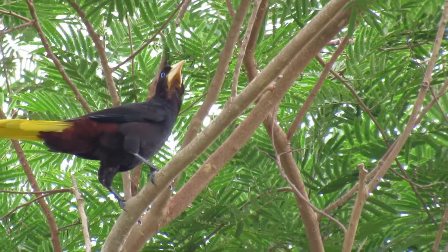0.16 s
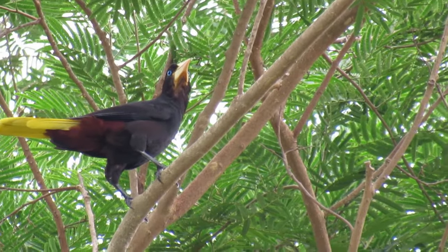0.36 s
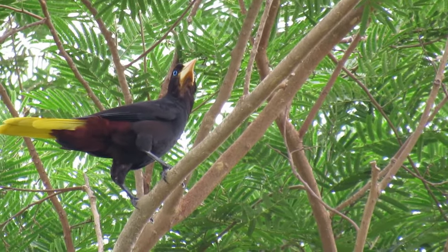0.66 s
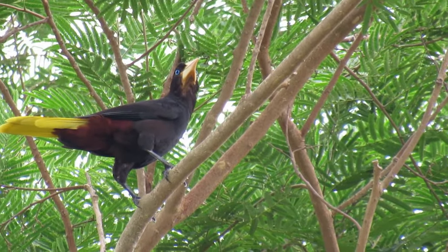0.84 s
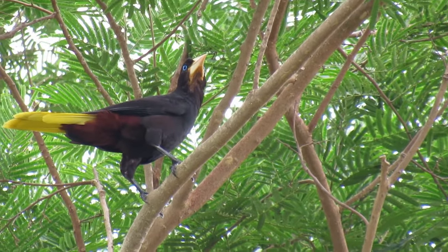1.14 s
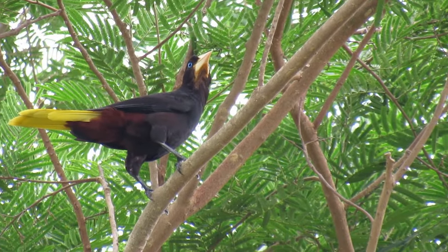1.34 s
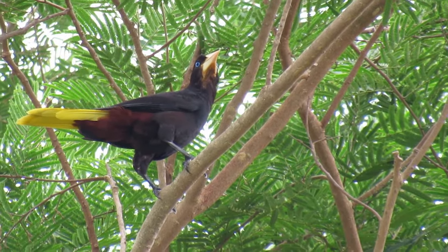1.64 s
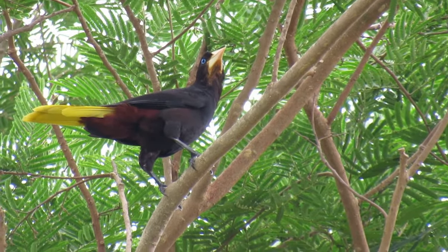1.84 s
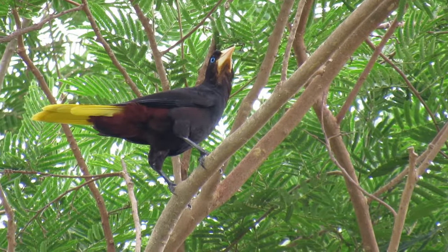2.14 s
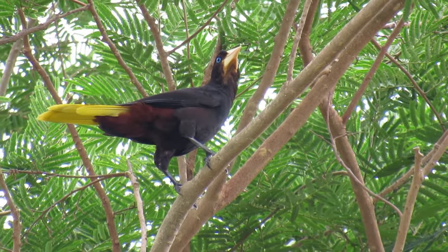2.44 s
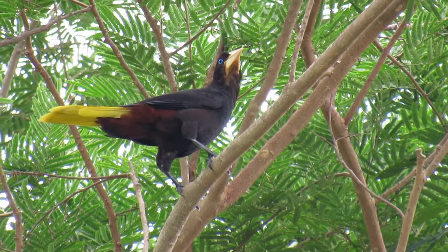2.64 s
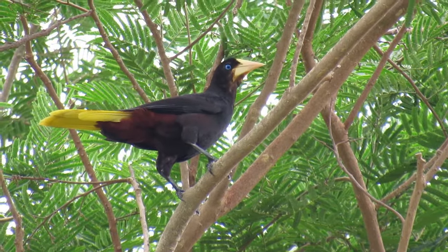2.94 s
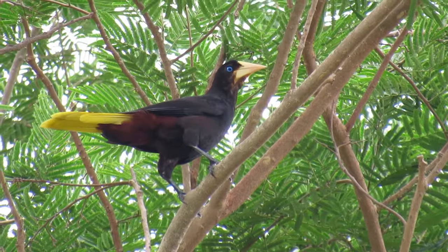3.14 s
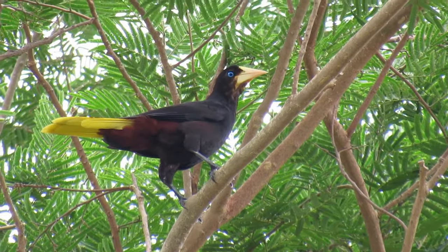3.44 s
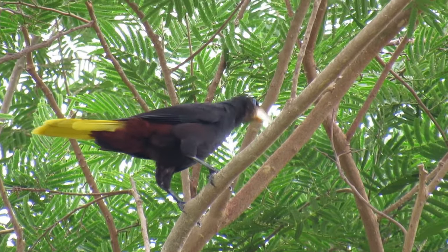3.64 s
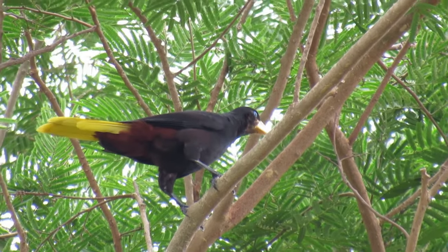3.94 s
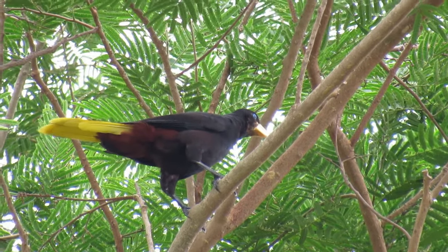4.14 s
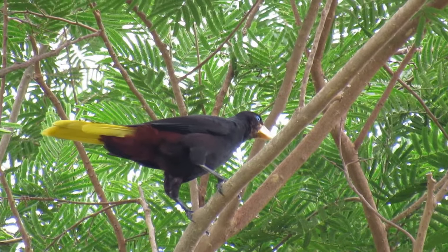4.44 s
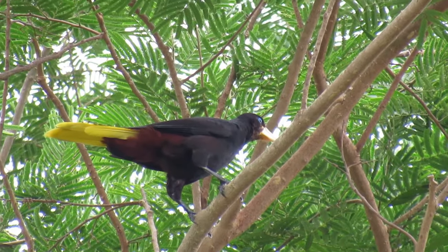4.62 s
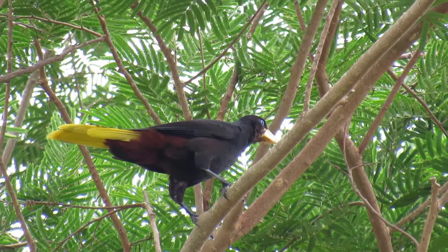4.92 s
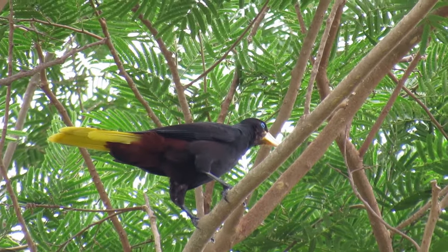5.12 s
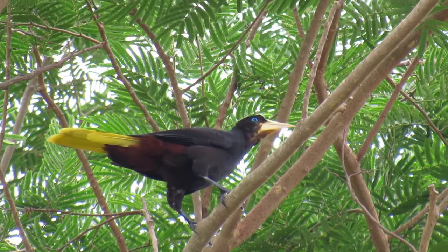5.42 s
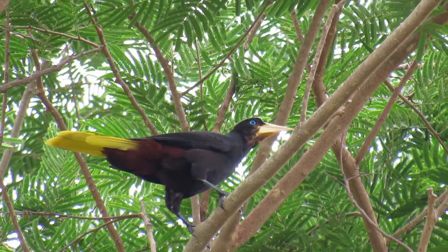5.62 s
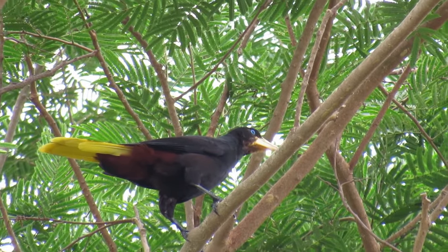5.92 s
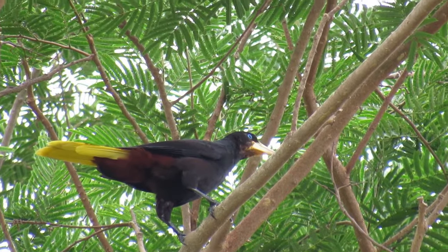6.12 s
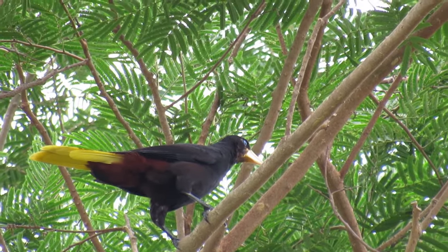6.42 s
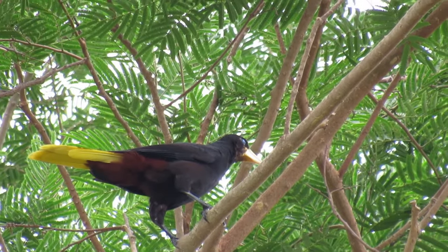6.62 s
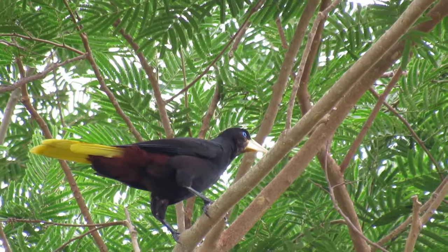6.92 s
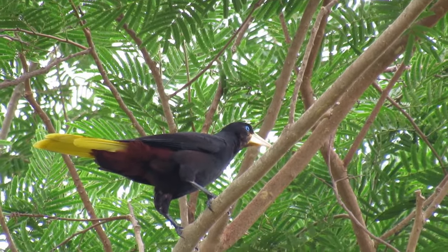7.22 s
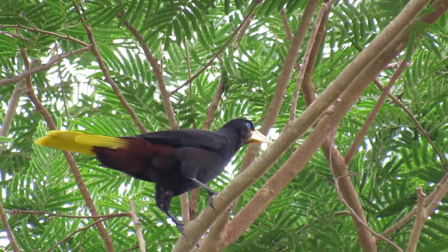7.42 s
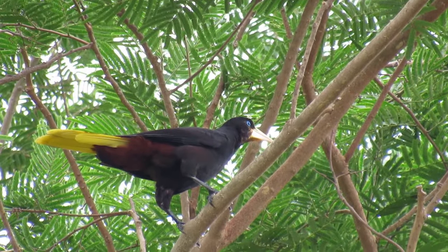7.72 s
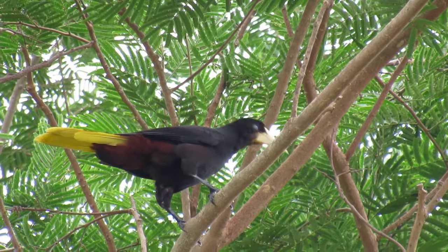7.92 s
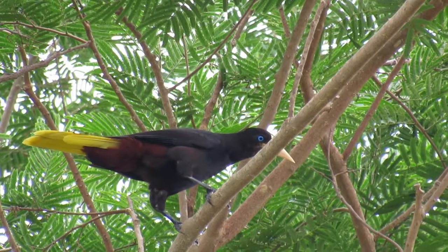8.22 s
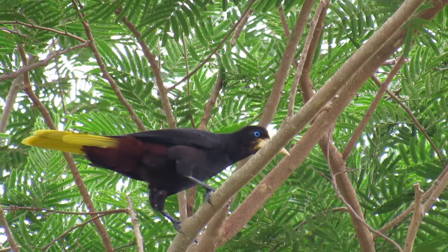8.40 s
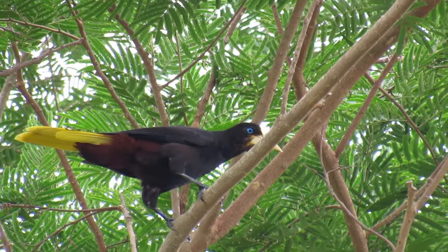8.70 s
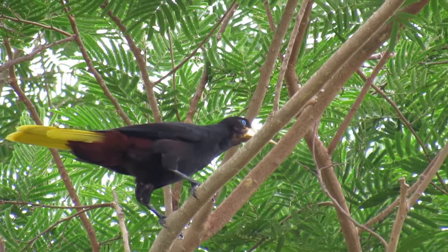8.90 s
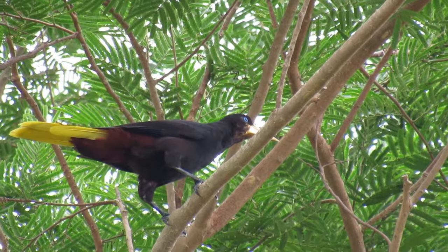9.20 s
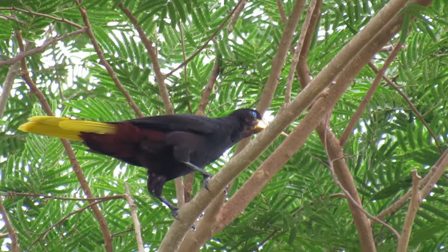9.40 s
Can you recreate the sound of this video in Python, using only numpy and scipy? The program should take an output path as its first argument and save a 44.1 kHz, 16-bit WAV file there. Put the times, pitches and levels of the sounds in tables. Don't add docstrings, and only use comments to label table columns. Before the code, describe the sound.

A crested black tropical bird in a leafy tree sings two stuttering falling whistle cascades with clucks and gurgles, over insect shrill and low engine idle.

```python
import sys
import numpy as np
from scipy import signal
from scipy.fft import rfft, irfft, next_fast_len
from scipy.io import wavfile
from scipy.ndimage import uniform_filter1d

SR = 44100
rng = np.random.default_rng(int(sys.argv[2]) if len(sys.argv) > 2 else 0)


def convert_level_to_amplitude(level_db):
    exponent = np.asarray(level_db, float) / 20
    return 10 ** exponent


def to_wav(s):
    ch = np.atleast_2d(s).T
    pcm = np.round(np.clip(ch, -1, 1) * 32767)
    wavfile.write(sys.argv[1], SR, pcm.astype(np.int16))


N = 421155
SIZE = next_fast_len(N)
HZ = np.maximum(np.arange(SIZE // 2 + 1) * SR / SIZE, 1)
TIME = np.arange(N) / SR
COARSE = 8

# f/Hz, density/dB
AIR_COLOUR = [(20, -49), (35, -24), (50, -12.5), (100, -8.5), (250, -13.5), (350, -19), (600, -24),
              (1200, -30), (2000, -36), (2600, -35), (3500, -42), (6000, -43), (10000, -47), (13800, -52.5),
              (15000, -68)]
AIR_DB = -43.5
# t/s, level/dB
RUSTLE = [
    (0.0, -52),
    (1.46, -57),
    (2.1, -54),
    (3.3, -59),
    (6.2, -61),
    (7.36, -55.5),
    (7.93, -59.5),
    (9.55, -62),
]
# f/Hz, left minus right/dB, right leads/rad, likeness/0-1
PORTS_AIR = [(47, -8, 1.1, 0.93), (140, -8.5, 1.8, .35), (262, -7.5, 3.77, 0.28), (388, -4, 3.81, 0.64),
             (900, -3.5, 4.17, 0.27), (1500, -2.5, 5.7, 0.48), (2500, -2, 5.67, 1), (5500, -1.5, 6.9, 0.74),
             (7060, -9, 5.5, 0.94), (9800, 0.5, 6.28, 1), (13000, 0, 6.28, 0.75)]
# f/Hz, left minus right/dB, right leads/rad
PORTS_TREE = [(700, -3, 5.44), (1500, -2.5, 5.8), (3000, -1, 6.5), (7000, -5.5, 6.24)]

# t/s, firing rate f/Hz, throb level/dB
ENGINE_IDLE = [
    (0.0, 44.5, -37.5),
    (0.5, 43.65, -39.5),
    (1.57, 44.28, -50),
    (1.86, 47.0, -42.5),
    (2.26, 45.83, -45.5),
    (4.55, 48.32, -38),
    (5.83, 46.96, -44.5),
    (6.3, 46.04, -43.5),
    (8.43, 46.89, -43.5),
    (9.55, 46.7, -52),
]
# level/dB, share of the throb's swell/0-1
ENGINE_UPPER = [(-44.5, 0.19), (-49, 0.22)]
# multiple of the firing rate, level/dB
ENGINE_REST = [(1.5, -59), (2.5, -67.5), (4, -54.5), (5, -57), (5.7, -56)]
# f/Hz, width/Hz, level/dB
WING_RINGS = [
    (7473, 380, -54.5),
    (7077, 144, -60),
    (6680, 250, -68),
]

# t/s, length/s, start f/Hz, end f/Hz, level/dB
CHIRPS = [(.065, 0.07, 4480, 4500, -58), (.96, .02, 3450, 3280, -58), (.8, .02, 3000, 2950, -61),
          (1.01, .03, 4750, 4750, -67), (8.43, .016, 3500, 3250, -60), (8.395, .02, 2650, 2900, -62),
          (8.565, .02, 2800, 3100, -62), (9.4, .09, 5230, 5200, -66), (0.481, 0.15, 5230, 5170, -58),
          (.7, 0.022, 3450, 3240, -54), (6.551, .42, 500, 632, -54), (1.55, 0.063, 5500, 5600, -63),
          (1.615, .05, 5200, 5250, -62), (1.675, .025, 5600, 5450, -54), (6.48, .02, 4100, 3700, -58),
          (6.565, .022, 3300, 2700, -59), (8.305, .018, 3900, 3400, -62), (6.524, 0.029, 2720, 2900, -59),
          (2.65, 0.23, 5900, 5680, -69), (3.0, 1, 6787, 7410, -53), (3.229, .03, 6100, 5280, -60),
          (4.982, 0.027, 3240, 3377, -68), (6.32, 0.11, 9870, 9900, -65), (6.63, 0.045, 2350, 2400, -60),
          (8.017, 0.063, 6510, 4300, -62), (8.25, 0.039, 6300, 5016, -57), (8.36, 0.028, 3700, 3302, -62),
          (8.578, 0.033, 3417, 3000, -59)]
# t/s, level/dB
TWITTER = [
    (6.19, -60),
    (6.22, -60),
    (6.295, -55),
    (6.395, -58),
]
CHIP_S, CHIP_FROM_HZ, CHIP_TO_HZ = .022, 2520, 3050
# t/s, length/s, level/dB
SCRAPES = [
    (1.439, 0.045, -45.5),
    (3.378, 0.052, -48),
    (4.636, 0.037, -46.5),
    (6.038, 0.045, -49),
    (7.704, 0.05, -52),
    (8.66, 0.049, -48.5),
]
# f/Hz, density/dB
SCRAPE_COLOUR = [(800, -33), (1400, -3), (2500, 0), (3100, -8), (3700, -5.5), (6000, -14), (10000, -12.5),
                 (12500, -26), (14000, -43)]

# t/s, f/Hz, level/dB, first and third partial re second/dB
FALL_A = [(1.712, 3900, -43, -12, -30), (1.728, 4050, -45, -14, -30), (1.742, 3680, -35, -12, -30),
          (1.775, 3720, -36, -5, -30), (1.812, 3590, -36, -18, -25), (1.826, 3300, -39, -20, -25),
          (1.846, 3400, -37, -22, -25), (1.872, 3260, -33, -20, -26), (1.905, 3160, -42, -10, -12),
          (1.925, 3010, -41, -3, -5), (1.962, 2950, -46, 0, 0), (1.995, 2860, -43, -3, -3),
          (2.048, 2760, -39, -8, -3), (2.088, 2650, -42, -3, -1), (2.125, 2630, -42, -5, -2)]
FALL_B = [(6.97, 3925, -49, -3, -20), (7.02, 3860, -47, -5, -15), (7.04, 3760, -47, -6, -4),
          (7.062, 3620, -48, -8, -4), (7.095, 3480, -48, -6, 0.), (7.122, 3380, -50, 0., 0.),
          (7.16, 3250, -43, -3, -10), (7.225, 3250, -48, -1, -5), (7.277, 2990, -55, 6, 6),
          (7.31, 2960, -58, 12, 13), (7.338, 2840, -54, 9, 6), (7.368, 2750, -52, 6, 10),
          (7.4, 2700, -54, 2, 12), (7.428, 2640, -46, -4, 3)]
# t/s, f/Hz, level/dB, first partial re second/dB
LOW_A = [
    (2.155, 1950, -56, 9),
    (2.19, 1860, -42, -2),
    (2.225, 1835, -44, -2),
    (2.266, 1824, -50, -16),
    (2.294, 1825, -48, -20),
    (2.354, 1818, -50, -16),
    (2.382, 1810, -62, -8),
]
LOW_B = [
    (7.465, 1930, -56, -9),
    (7.5, 1775, -49, 6),
    (7.578, 1755, -50, 2),
    (7.588, 1675, -49, 5),
    (7.655, 1650, -52, 1),
    (7.7, 1640, -60, -4),
]
# t/s, f/Hz, level/dB, first partial (in END_A also the fourth) re second/dB
END_A = [
    (2.386, 2200, -54, -6),
    (2.405, 2160, -48, 0),
    (2.45, 2240, -40.5, -6),
    (2.475, 2210, -48, 3),
    (2.509, 2242, -58, -12),
    (2.575, 2210, -70, -6),
]
END_B = [
    (7.668, 2090, -48, -12),
    (7.685, 2140, -42, -18),
    (7.71, 2200, -50, 1),
    (7.746, 2242, -48, 4),
    (7.79, 2230, -54, -5),
    (7.9, 2260, -68, -8),
]
# t/s, length/s, start f/Hz, end f/Hz, level/dB
STRANDS = [(1.704, .018, 6650, 6600, -46), (2.095, .06, 4650, 4550, -48), (1.905, .05, 4700, 4600, -52),
           (2.03, .03, 6450, 6350, -51), (7.635, .045, 8250, 8100, -48), (7.5, .05, 7250, 7100, -48),
           (7.082, .02, 9250, 9200, -52), (7.084, .012, 6350, 6300, -50), (1.763, .014, 6400, 6500, -40),
           (1.828, .014, 6200, 4750, -44), (1.838, .055, 4750, 4620, -48), (2.466, .022, 2170, 2020, -46),
           (2.468, .035, 8200, 8150, -48), (7.255, .03, 5900, 5850, -52), (7.475, .03, 5620, 5580, -50),
           (7.475, .04, 4700, 4650, -54), (7.64, .1, 6400, 6620, -50), (7.955, .06, 2800, 2600, -60),
           (8.055, .025, 4300, 4250, -58), (8.175, .03, 4300, 4150, -56)]
# f/Hz, gain/dB
BEAK = [(1800, -6), (3500, -4), (5400, -0.5), (5900, -6), (6700, 3), (7400, -3), (8100, -0.5), (8900, -4),
        (9800, -6), (11500, -16)]
NOTE_SAG_PER_S, NOTE_GAP_DB, NOTE_GAP_S, OVERLAP_S = .1, -4, .004, .008

# t/s, peak/dB, lower ring f/Hz, upper ring re peak/dB, puff re peak/dB
CLUCKS = [(1.6531, -46, 1150, -17, -1), (1.7053, -49, 1060, -10, 8), (1.767, -40, 1610, -21, -8),
          (1.8326, -34, 1346, -2.5, -10), (1.9048, -30, 1405, -11, -12), (1.9608, -28.5, 1430, -12, -4.5),
          (2.0324, -32, 1343, -6, -6), (2.0965, -36.5, 1275, -4.5, -2), (7.0836, -41.5, 1163, -5.5, 1),
          (7.1474, -42, 1530, -9, 2), (7.2168, -47, 1520, 0., 8), (7.2823, -41, 1536, -1, 1),
          (7.3485, -41.5, 1334, 5.5, -10), (8.0384, -43.5, 1535, -10, -9), (8.1777, -47, 1650, -6, -7)]
UPPER_RING_HZ = 1993
BREAK_DB, BREAK_S, BREAK_HOARSE = -9, 0.0233, 1.1
# t/s, peak/dB, fold rate f/Hz
BUZZES = [(1.9608, -44, 330), (2.0324, -43, 325), (2.0965, -40, 320), (7.0836, -48, 295),
          (7.1474, -45, 309), (7.2168, -49, 312), (7.2823, -47, 315), (7.3485, -51, 330), (8.04, -52, 310),
          (8.1777, -52, 330)]
BUZZ_DB = [-3, -3, -1, -4, -11, -10, -10]
# t/s, peak/dB, top partial f/Hz
GURGLES = [(2.231, -32, 1454), (2.247, -38, 1400), (2.265, -28, 1460), (2.295, -31, 1414),
           (2.331, -31.5, 1366), (2.363, -34, 1300), (2.926, -37, 1340), (7.532, -31.5, 1385),
           (7.566, -36, 1460), (7.594, -29, 1420), (7.629, -31.5, 1444), (7.657, -31, 1330)]
GURGLE_DB = [-4.5, -5, -6.5]
# t/s, f/Hz, level/dB, third partial re level/dB
COO_A = [
    (2.66, 489, -50.5, -23),
    (2.728, 510.6, -36.5, -33),
    (2.79, 497, -35, -23),
    (2.81, 491.7, -34, -11),
    (2.89, 477, -35, -10),
    (2.91, 467.4, -38.5, -16),
    (2.946, 449, -39.5, -10),
    (3.01, 391, -53, -9),
]
# t/s, f/Hz, level/dB
COO_B = [
    (6.56, 1536, -61),
    (6.626, 1480, -62),
    (6.87, 1493, -64),
    (6.91, 1496, -56.5),
    (7.0, 1430, -61),
]
# t/s, peak/dB, f/Hz, length/s
HOOTS = [(1.29, -37, 954, 0.0091), (1.339, -46, 900, 0.012), (1.529, -47.5, 1238, .012),
         (1.763, -41, 1117, 0.0099), (2.149, -32.5, 951, 0.025), (2.495, -35.5, 900, .03),
         (2.529, -41.5, 848, 0.022), (6.264, -47, 930, .015), (6.385, -45, 802, 0.027),
         (6.401, -51, 1950, 0.0072), (6.48, -48, 870, .02), (6.541, -39.5, 946, 0.05),
         (6.712, -49.5, 1120, 0.019), (6.838, -49.5, 1153, 0.032), (6.934, -41.5, 1160, .014),
         (7.014, -33.5, 1163, 0.014), (7.409, -26.5, 1460, 0.021), (7.462, -34.5, 953, 0.023),
         (7.783, -31.5, 828, 0.036), (7.84, -46, 820, 0.052), (7.953, -37, 943, 0.028),
         (7.986, -38.5, 900, 0.031), (8.04, -51, 862, 0.051)]
# f/Hz, gain/dB
CROP = [(480, -21.5), (900, 0.5), (1600, 1)]
# f/Hz, gain/dB
THROAT = [(600, -25), (900, 0), (1600, 8), (2300, -10), (3500, 1), (5000, -8.5), (6800, 9), (8500, 2),
          (10500, -25)]
# full from t/s, until t/s, level/dB
SONGS = [
    (1.796, 2.385, -47),
    (7.153, 7.698, -50),
]
RISE_DB_PER_S, FADE_DB_PER_S, REST_DB = 82, 120, -73


def along(table, column=1):
    rows = np.array(table)
    return np.interp(np.log(HZ), np.log(rows[:, 0]), rows[:, column])


def walk(rate, size=N):
    hold = int(SR / rate)
    steps = np.repeat(rng.standard_normal(size // hold + 1), hold)
    return 1.3 * uniform_filter1d(uniform_filter1d(steps, hold), hold)[:size]


def unit(x):
    return x / np.sqrt(np.mean(x ** 2))


def add(out, start, x):
    i = int(start * SR)
    out[i:i + len(x)] += x[:N - i]


def ports(mono, balance_db, lead, other=0., likeness=1.):
    left, right = convert_level_to_amplitude(balance_db / 2), convert_level_to_amplitude(-balance_db / 2)
    average = np.sqrt(left ** 2 + right ** 2 + 2 * left * right * likeness * np.cos(lead)) / 2
    second = likeness * np.exp(1j * lead) * mono + np.sqrt(1 - likeness ** 2) * other
    return np.array([left * mono, right * second]) / average


def leaves(x, wet_db, t60):
    t = np.arange(int(.6 * SR)) / SR
    decay = np.exp(-np.log(1000) * t / t60) * np.minimum(t / 0.0055, 1)
    tails = rng.standard_normal((2, len(t))) * decay
    tails = rfft(convert_level_to_amplitude(wet_db) * tails / np.sqrt(np.sum(tails[0] ** 2)), SIZE)
    direct = ports(1., along(PORTS_TREE), along(PORTS_TREE, column=2))
    sides = 0.19 * tails[1] * np.array([[1], [-1]])
    return rfft(x, SIZE) * (direct + tails[0] + sides)


def glides(rows):
    out = np.zeros(N)
    for s, length, start_hz, end_hz, db in rows:
        size = int(length * SR)
        hz = np.linspace(start_hz, end_hz, size) * (1 + .007 * walk(120, size=size))
        turn = 2 * np.pi * np.cumsum(hz) / SR
        gain = convert_level_to_amplitude(db + 2.5 * walk(90., size=size)) * np.sqrt(np.hanning(size))
        add(out, s, gain * np.sin(turn))
    return out


def air():
    noise = rfft(rng.standard_normal((2, SIZE))) * convert_level_to_amplitude(along(AIR_COLOUR))
    likeness = np.clip(along(PORTS_AIR, column=3), 0, .99)
    pair = ports(noise[0], along(PORTS_AIR), along(PORTS_AIR, column=2), noise[1], likeness)
    swell = np.interp(TIME[::COARSE], *np.transpose(RUSTLE)) - np.mean(RUSTLE, axis=0)[1]
    out = 0
    for octave in range(5, 15):
        band = np.cos(np.pi / 2 * np.clip(np.log2(HZ) - octave, -1, 1)) ** 2
        rustle_db = 0.56 * (8 < octave < 13) * swell
        gain = convert_level_to_amplitude(rustle_db + walk(6 * COARSE, size=len(swell)))
        out = out + np.repeat(gain, COARSE)[:N] * irfft(pair * band, SIZE)[:, :N]
    return convert_level_to_amplitude(AIR_DB) * out / np.sqrt(np.mean(out.mean(axis=0) ** 2))


def engine():
    s, hz, throb = np.transpose(ENGINE_IDLE)
    t = np.arange(0, N + COARSE, COARSE) / SR

    def drift(rate):
        return walk(rate * COARSE, size=len(t))

    levels = [throb] + [db + share * (throb - throb.mean()) for db, share in ENGINE_UPPER]
    turn = 2 * np.pi * np.cumsum(np.interp(t, s, hz)) * COARSE / SR
    out = np.zeros(len(t))
    for order, db in enumerate(levels, 1):
        out += convert_level_to_amplitude(np.interp(t, s, db) + order * 0.74 * drift(9.)) * np.sin(order * turn + order)
    for order, db in ENGINE_REST:
        out += convert_level_to_amplitude(db + 3.54 * drift(5.)) * np.sin(order * turn + 0.64 * drift(6.))
    bass = rfft(np.interp(TIME, t, out), SIZE) * (HZ < SR / COARSE / 2)
    balance_db = np.interp(HZ, [47, 95], [-10, -15])
    return ports(np.sqrt(2) * bass, balance_db, np.interp(HZ, [47, 95], [1.2, 1.7]))


def insect():
    strokes = 1 + .6 * np.cos(2 * np.pi * 72 * TIME + .3 * walk(8))
    noise = rfft(rng.standard_normal((2, N)) * unit(strokes) * convert_level_to_amplitude(.5 * walk(1.68)), SIZE)
    ring = 0
    for hz, width, db in WING_RINGS:
        ring = ring + convert_level_to_amplitude(db) * np.sqrt(SR / 2 / width) / (1 + (2 * (HZ - hz) / width) ** 4)
    return ports(noise[0] * ring, -3.0, .05, noise[1] * ring, likeness=0.95)


def far_birds():
    hoarse = unit(irfft(rfft(rng.standard_normal(SIZE)) * convert_level_to_amplitude(along(SCRAPE_COLOUR)), SIZE))
    chips = [(s, CHIP_S, CHIP_FROM_HZ, CHIP_TO_HZ, db) for s, db in TWITTER]
    out = glides(CHIRPS + chips)
    for s, length, db in SCRAPES:
        size, i = int(length * SR), int(s * SR)
        add(out, s, convert_level_to_amplitude(db) * np.hanning(size) * hoarse[i:i + size])
    return out


def effort(t):
    songs = []
    for start, end, db in SONGS:
        rise = RISE_DB_PER_S * np.maximum(start - t, 0)
        fade = FADE_DB_PER_S * np.maximum(t - end, 0)
        songs.append(db - rise - fade)
    return np.maximum(np.max(songs, axis=0), REST_DB)


def tone(hz, length, sag, tail, attack=.0028):
    t = np.arange(int((length + 4 * tail) * SR)) / SR
    rise = np.sin(np.pi / 2 * np.minimum(t / attack, 1)) ** 2
    shape = rise * np.exp(-np.maximum(t - length, 0) / tail)
    bend = 1 + sag * (np.exp(-t / 0.014) - .5)
    return shape * np.sin(2 * np.pi * hz * np.cumsum(bend) / SR), shape


def rasp(out, count=4000):
    s, pitch, size = np.transpose(rng.random((count, 3)) * (N / SR, 1, 1))
    levels = effort(s) - 17.6 * size
    heard = levels > -70
    for start, hz, db in zip(s[heard], 2400 + 7400 * pitch[heard], levels[heard]):
        add(out, start, convert_level_to_amplitude(db) * tone(hz, length=0.0087, sag=0.048, tail=.003)[0])


def hoots(out):
    for s, db, hz, length in HOOTS:
        note = tone(hz, length, sag=0.045, tail=0.0045, attack=.008)[0]
        add(out, s, convert_level_to_amplitude(db) * (note + .17 * note ** 2))


def gurgles(rings):
    for (s, db, hz), lags in zip(GURGLES, rng.random((len(GURGLES), 3))):
        for k, partial_db, lag in zip((6, 5, 4), GURGLE_DB, lags):
            partial_hz = hz * (k + 0.41 * lag - .2) / 6
            partial = tone(partial_hz, length=0.0086, sag=.26, tail=0.005)[0]
            add(rings, s + .005 * lag, convert_level_to_amplitude(db + partial_db) * partial)


def clucks(rings, puffs, buzz_hz):
    for s, db, lower_hz, upper_db, puff_db in CLUCKS:
        lower = tone(lower_hz, length=0.011, sag=.12, tail=0.0052)[0]
        upper_hz = UPPER_RING_HZ * (lower_hz / 1400) ** .15
        upper = tone(upper_hz, length=0.011, sag=0.11, tail=0.0046)[0]
        shape = tone(lower_hz, length=.007, sag=0, tail=.005, attack=.0012)[1]
        folds = .35 + np.cos(np.pi * buzz_hz * np.arange(len(shape)) / SR) ** 2
        breath = unit(folds * rng.standard_normal(len(shape)))
        add(rings, s, convert_level_to_amplitude(db) * lower)
        add(rings, s, convert_level_to_amplitude(db + upper_db) * upper)
        add(puffs, s, convert_level_to_amplitude(db + puff_db) * shape * breath)
    for s, db, hz in BUZZES:
        for k, partial_db in enumerate(BUZZ_DB, 3):
            partial = tone(k * hz, length=.011, sag=.03, tail=.004, attack=.002)[0]
            add(rings, s, convert_level_to_amplitude(db + partial_db) * partial)


def notes(rows, until):
    curve = []
    ends = [row[0] for row in rows[1:]] + [until]
    for (s, hz, db, *outer), end in zip(rows, ends):
        last_hz = hz * (1 - NOTE_SAG_PER_S * (end - s))
        curve.append((s, hz, db + NOTE_GAP_DB, *outer))
        curve.append((s + NOTE_GAP_S, hz, db, *outer))
        curve.append((end - NOTE_GAP_S, last_hz, db, *outer))
    return curve


def sing(out, phrase, tract, flutter_db, wobble, hoarse, multiples=(1, 2, 3, 4), leans=(1, 0, 0, 1)):
    rows = np.vstack(phrase)
    t = np.arange(rows[0, 0], rows[-1, 0], 1 / SR)
    size = len(t)
    curves = [uniform_filter1d(np.interp(t, rows[:, 0], c), size=90) for c in rows[:, 1:].T]
    hz, level, *bright = curves
    bright = bright + [0]
    throb = (31 * t + .15 * walk(15, size=size)) % 1
    throb = uniform_filter1d(throb, size=120)
    waver = 1 + wobble * (walk(70, size=size) + 1.5 - 3 * throb)
    turn = 2 * np.pi * np.cumsum(hz * waver) / SR
    stutter = np.minimum(walk(60, size=size), 1) + .6 - 4 * throb ** 4
    edge = np.minimum(1, np.minimum(t - t[0], t[-1] - t) / 0.0029)
    choke = sum(np.clip(2 - 2 * abs(2 * (t - s) / BREAK_S - 1), 0, 1) for s, *_ in CLUCKS)
    hoarse = hoarse + BREAK_HOARSE * choke
    for k, lean in zip(multiples, leans):
        lean_db = bright[lean - 1] if lean else 0
        db = level + lean_db + BREAK_DB * choke + np.interp(k * hz, *np.transpose(tract))
        flutter = stutter + np.minimum(walk(148.2, size=size), 1)
        gain = edge * convert_level_to_amplitude(db + flutter_db * flutter)
        sine, cosine = np.sin(k * turn), np.cos(k * turn)
        fringe = hoarse * (walk(500, size=size) * sine + walk(500, size=size) * cosine)
        add(out, t[0], np.sqrt(2) * gain * (sine + fringe))


def whistle(high):
    for fall, after in ((FALL_A, LOW_A), (FALL_B, LOW_B)):
        cascade = notes(fall, after[0][0] + OVERLAP_S)
        sing(high, cascade, BEAK, flutter_db=2.3, wobble=.005, hoarse=.36, multiples=(1, 2, 3), leans=(1, 0, 2))
    sing(high, LOW_A, BEAK, flutter_db=3.4, wobble=.008, hoarse=.38, leans=(1, 0, 0, 0))
    sing(high, END_A, BEAK, flutter_db=2.6, wobble=0.006, hoarse=.3)
    sing(high, END_B, BEAK, flutter_db=2.6, wobble=.007, hoarse=.42, multiples=(1, 2, 4), leans=(1, 0, 0))
    sing(high, LOW_B, BEAK, flutter_db=3.2, wobble=.008, hoarse=.4, multiples=(1, 2, 3), leans=(1, 0, 0))


def coos(low):
    sing(low, COO_A, CROP, flutter_db=0.9, wobble=.002, hoarse=0.066, leans=(0, 0, 1))
    sing(low, COO_B, CROP, flutter_db=2.0, wobble=0.006, hoarse=0.37, multiples=[1])


def bird():
    high, low, puffs = np.zeros((3, N))
    whistle(high)
    clucks(low, puffs, buzz_hz=324)
    gurgles(low)
    for s, until, _ in SONGS:
        part = slice(int((s - .3) * SR), int((until + .3) * SR))
        difference = signal.hilbert(high[part]) * np.conj(signal.hilbert(low[part]))
        high[part] += 12. * difference.real
    coos(low)
    hoots(low)
    rasp(puffs)
    high = high + glides(STRANDS)
    puffs += convert_level_to_amplitude(effort(TIME) - 7.) * rng.standard_normal(N)
    beak_band = 1 / (1 + (HZ / 11800) ** 16) / (1 + (1300 / HZ) ** 6)
    out = irfft(rfft(high, SIZE) * beak_band + rfft(puffs, SIZE) * convert_level_to_amplitude(along(THROAT)), SIZE)[:N]
    return leaves(out, wet_db=-5.5, t60=.26) + leaves(low, wet_db=-7.5, t60=0.36)


def scene():
    tree = bird() + leaves(far_birds(), wet_db=-4, t60=0.25)
    return irfft(tree + engine() + insect(), SIZE)[:, :N] + air()


def roll_off(x):
    return signal.sosfilt(signal.butter(12, 15010, fs=SR, output="sos"), x)


def record(dry):
    notch = 1 - 0.85 / (1 + ((HZ - 695) / 110) ** 2)
    mix = irfft(rfft(dry, SIZE) * notch, SIZE)[:, :N]
    return roll_off(mix)


dry = scene()
out = record(dry)
to_wav(out)
```